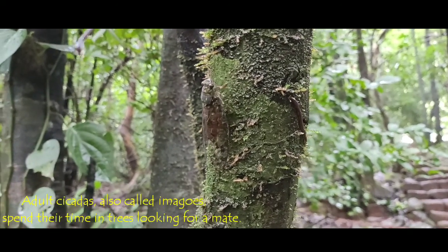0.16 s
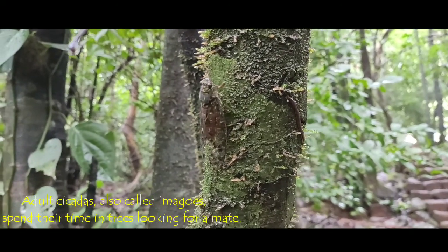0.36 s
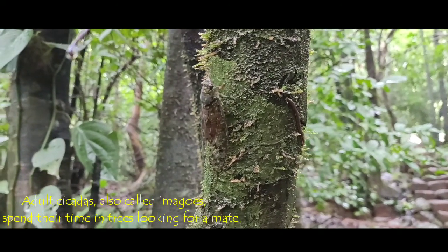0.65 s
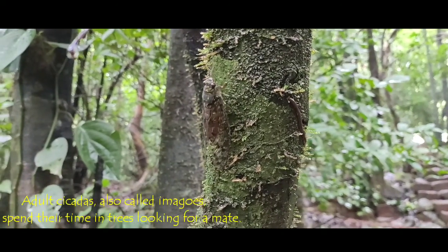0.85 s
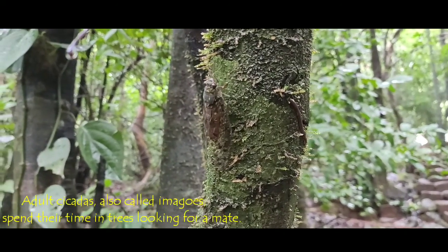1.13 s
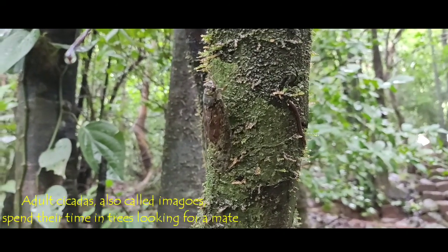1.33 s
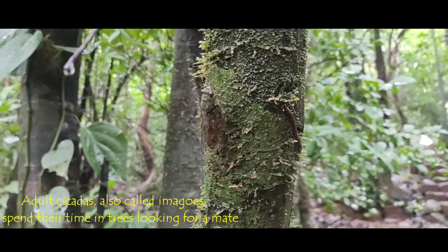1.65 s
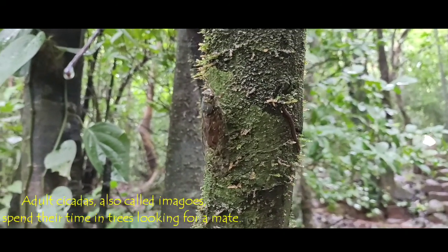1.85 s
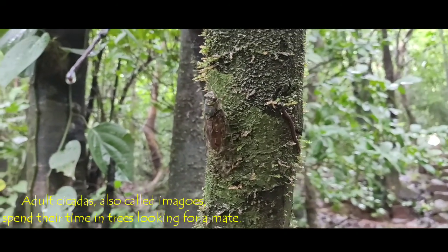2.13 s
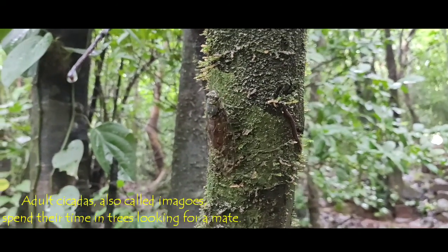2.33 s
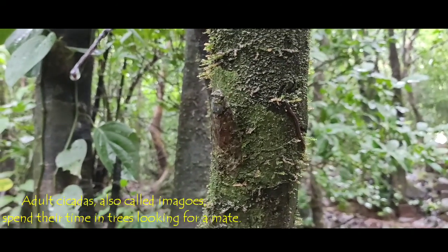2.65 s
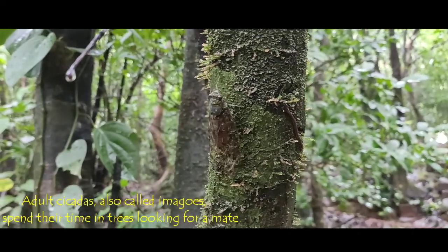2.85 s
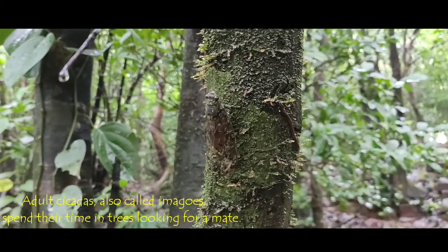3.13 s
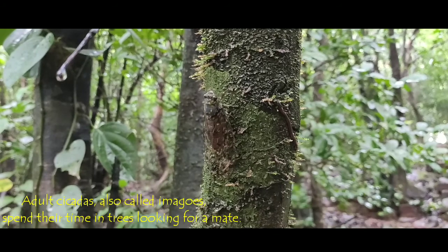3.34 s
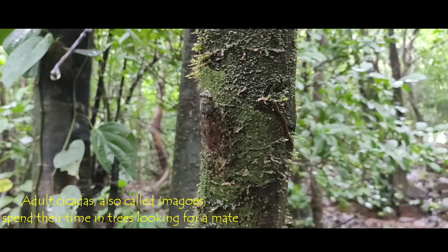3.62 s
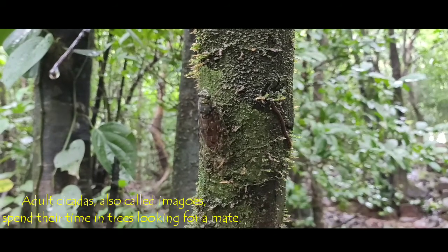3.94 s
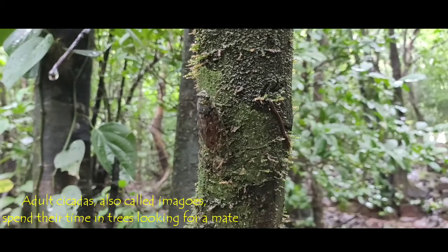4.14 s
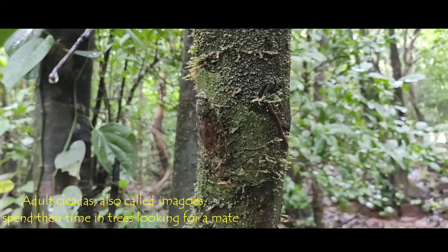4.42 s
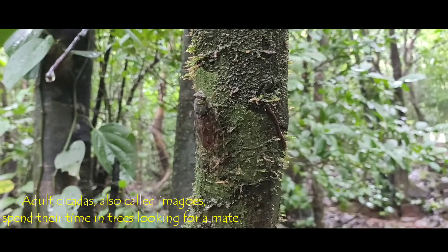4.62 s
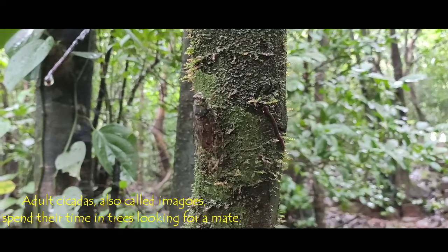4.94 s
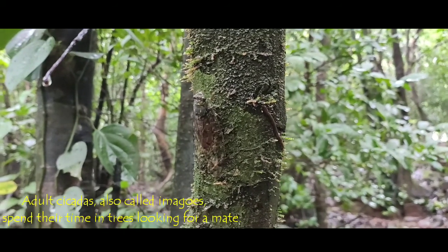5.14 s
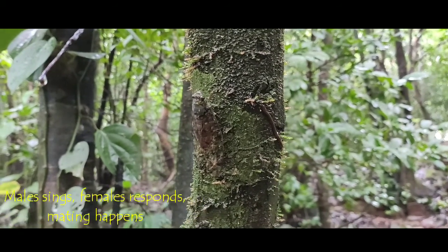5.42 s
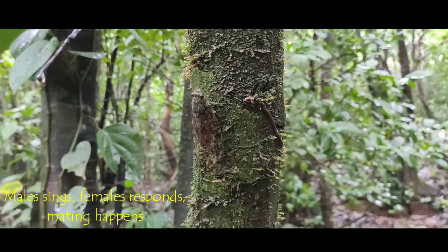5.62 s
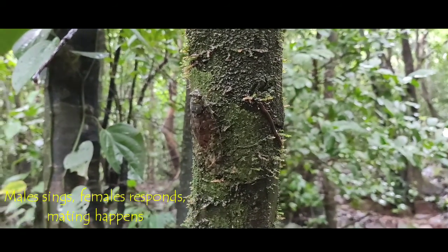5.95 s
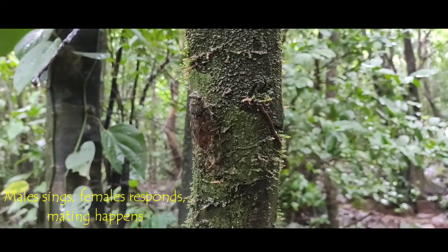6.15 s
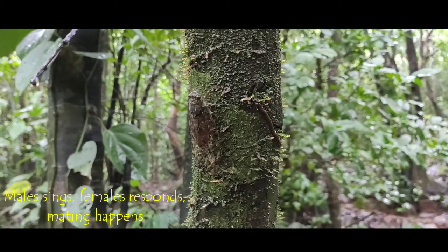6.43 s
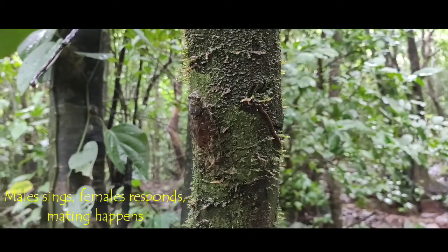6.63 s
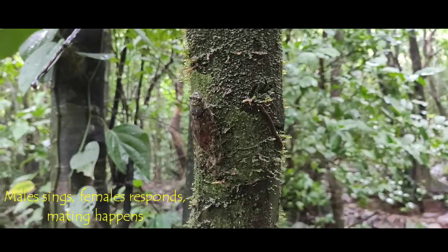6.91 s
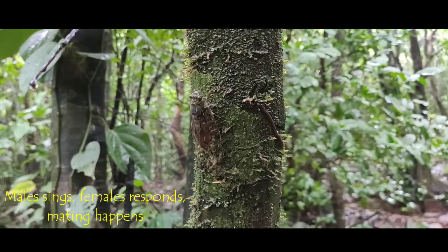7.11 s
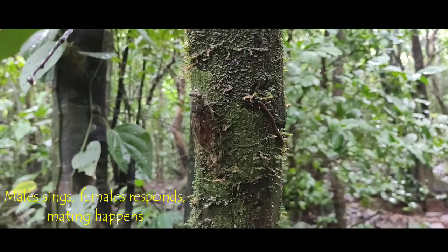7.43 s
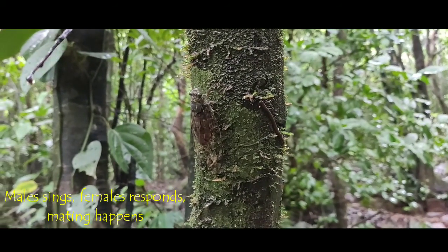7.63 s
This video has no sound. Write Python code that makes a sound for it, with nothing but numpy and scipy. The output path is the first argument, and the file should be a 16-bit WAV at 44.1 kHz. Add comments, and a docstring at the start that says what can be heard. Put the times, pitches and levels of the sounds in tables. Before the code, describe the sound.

In a still forest, one nearby cicada sings a high, dry, buzzing phrase over and over: quick chirps, a loud rasp, a softer rattle.

```python
"""A male cicada sings on a tree trunk in a quiet forest, close to a camera with two microphone ports.
Every click is a buckling of its tymbals, ringing the air sac in its abdomen. About once a second it sings
the same phrase: a run of short chirps, a loud rasp that falls in pitch, then a slow soft rattle.
Nearby bark and leaves scatter the song, distant trunks return a faint tail, and the air rumbles low."""
import sys
import numpy as np
from scipy import signal
from scipy.fft import rfft, irfft
from scipy.io import wavfile

SR = 44100
rng = np.random.default_rng(int(sys.argv[2]) if len(sys.argv) > 2 else 0)


def inscribe(sig):
    """Save sig as 16-bit PCM at rate SR to the path in sys.argv[1].

    A 1-D sig is mono; a 2-D sig holds one channel per row.
    Samples are clipped to [-1, 1] before scaling.
    """
    pcm = np.round(np.clip(np.atleast_2d(sig).T, -1, 1) * 32767)
    wavfile.write(sys.argv[1], SR, pcm.astype(np.int16))


N = 342657


def amp(db):
    """Decibels to gain."""
    return 10 ** (np.asarray(db) / 20)


def unit(x):
    """Scales each row to energy 1."""
    return x / np.sqrt(np.sum(x ** 2, -1, keepdims=True) + 1e-20)


def read(points, hz, column=1):
    """Reads one column of a table on a log-frequency axis."""
    table = np.transpose(points)
    return np.interp(np.log(hz + 1), np.log(table[0] + 1), table[column])


def forest_air(level_db=-53):
    """Still air all around the microphone: a steady low rumble, alike in both ports only in the bass."""
    # spectrum of the air (frequency [Hz], relative density [dB])
    spectrum = [(15, -9), (28, 2.5), (55, -2.5), (110, -9), (250, -14), (500, -20), (1200, -26.5),
                (2500, -26.5), (5000, -26), (9000, -31.5), (16000, -40)]
    # likeness of the air at the two ports (frequency [Hz], correlation [0-1])
    likeness = [(30, 0.92), (120, 0.98), (300, 0.89), (700, 0.49), (2000, .1)]
    hz = np.fft.rfftfreq(N, 1 / SR)
    left, other = rfft(rng.standard_normal((2, N)))
    same = read(likeness, hz)
    right = same * left + np.sqrt(1 - same ** 2) * other
    pair = irfft(np.array([left, right]) * amp(read(spectrum, hz)), N)
    balance = amp([[.4], [-.4]])
    return amp(level_db) * balance * np.sqrt(N) * unit(pair)


def forest_echoes(song, near_db=-11, near_s=.0079, far_db=-20):
    """Bark and leaves close by scatter the song at once; distant trunks return a faint tail."""
    # reverberation among the trees (frequency [Hz], time to fall 60 dB [s])
    decay = [(300, 0.57), (2000, 0.65), (5000, 0.47), (9000, 0.33), (16000, 0.66)]
    t = np.arange(SR) / SR
    near = unit(rng.standard_normal((2, SR)) * np.exp(-t / near_s) * (t > .001))
    hz, frame_s, frames = signal.stft(rng.standard_normal((2, SR)) * (t > .008), SR, nperseg=256)
    fade = amp(-60 * frame_s / read(decay, hz)[:, None])
    far = unit(signal.istft(frames * fade, SR, nperseg=256)[1][:, :SR])
    return signal.fftconvolve(song, amp(near_db) * near + amp(far_db) * far, axes=1)[:, :N]


def microphone_ports(song):
    """The insect sits off to one side: the camera's casing gives each port its own level and phase."""
    # the insect at the ports (frequency [Hz], left over right [dB], left phase lead [rad])
    response = [(200, 3, -2.45), (740, 4.5, -1.26), (1608, -2, -1.86), (2160, -6, 0.3), (2600, 1.6, -1.46),
                (3440, -2.5, -1), (4260, 1.7, -0.87), (5080, 10, -1.75), (5350, 2, -2.5), (5800, 9, -6),
                (7200, -2.8, -3.5), (8300, 0.5, -3), (8440, 1.3, -8), (14800, -1.2, -9.5)]
    hz = np.fft.rfftfreq(N, 1 / SR)
    left = amp(read(response, hz))
    right = np.exp(-1j * read(response, hz, column=2))
    gains = np.array([left, right]) * np.sqrt(2 / (1 + left ** 2))
    return irfft(rfft(song) * gains, N)


def trunk_echo(song, delay_s=.0003864, echo_db=-16):
    """The bark right under the insect returns each click at once and combs its spectrum."""
    hz = np.fft.rfftfreq(N, 1 / SR)
    comb = 1 + amp(echo_db) * np.exp(-2j * np.pi * hz * delay_s)
    return irfft(rfft(song) * comb, N) / np.hypot(1, amp(echo_db))


def add_clicks(mix, times, clicks):
    """Adds clicks, shaped (channels, clicks, samples), at their times."""
    for k, start in enumerate(times):
        part = mix[:, max(round(start * SR), 0):][:, :clicks.shape[-1]]
        part += clicks[:, k, :part.shape[1]]


def minimum_phase(spectrum, size=512):
    """The sharpest impulse response that has a given spectrum."""
    log_gain = np.log(amp(read(spectrum, abs(np.fft.fftfreq(size, 1 / SR)))))
    return unit(np.fft.ifft(np.exp(np.conj(signal.hilbert(log_gain)))).real)


def ring(hz, db, width_hz, rise_s, stray, size=512):
    """One dying resonance per click, each a little off pitch."""
    t = np.arange(size) / SR
    pitch = hz * (1 + stray * rng.standard_normal(len(db)))
    envelope = np.exp(-np.pi * width_hz * t) * (1 - np.exp(-t / rise_s)) ** 2
    return amp(db)[:, None] * unit(envelope * np.sin(2 * np.pi * pitch[:, None] * t))


def rib_crack(colour, db, crumple, crumple_s, alike, puff_hz=1600, size=512):
    """One snap per click, trailed by the crumpling ribs, which fold partly alike within a syllable."""
    t, hz = np.arange(size) / SR, np.fft.rfftfreq(size, 1 / SR)
    habit, chance = rng.standard_normal((2, 1, size)), rng.standard_normal((2, len(db), size))
    fade = np.exp(-t / crumple_s)
    grains = unit((np.sqrt(alike) * habit + np.sqrt(1 - alike) * chance) * fade)
    snap = unit((t == 0) + crumple * grains)
    puff = unit(chance * fade)  # the shapeless low end, new with every click
    lowpass = 1 / (1 + 1j * hz / puff_hz) ** 2
    highpass = (1j * hz / puff_hz) ** 2 * lowpass
    click = irfft(highpass * rfft(snap) + lowpass * rfft(puff), size)
    coloured = signal.fftconvolve(click, minimum_phase(colour)[None, None], axes=-1)[..., :size]
    return amp(db)[:, None] * unit(coloured)


def strokes(start, end, per_s, jitter, tempo_spread=.017, count=64):
    """Times of the muscle pulls within one syllable; each syllable has its own tempo."""
    tempo = per_s * (1 + tempo_spread * rng.standard_normal())
    gaps = (1 + jitter * rng.standard_normal(count)) / tempo
    times = start + np.cumsum(gaps) - gaps[0]
    return times[times <= max(end, start)]


def force(times, per_s, uneven_db):
    """Size of each click, so that a train of unit-energy clicks lies near 0 dB."""
    return np.sqrt(SR / per_s) * amp(uneven_db * rng.standard_normal(len(times)))[:, None]


def swell(x, rise, fall):
    """A bell curve: 1 at x = 0, with its own width on each side."""
    return np.exp(-(x / np.where(x < 0, rise, fall)) ** 2)


def phrase_at(time_s, overhang_s=.1):
    """The phrase that a chirp or rasp syllable belongs to."""
    # phrases, each built around the crest of its rasp (crest [s], crest span [s], air sac lead [s],
    # air sac fade [s], top pitch [Hz], end pitch [Hz], air sac strength [dB], octave strength [dB],
    # tymbal plate strength [dB], crack strength [dB], chirp strength [dB])
    phrases = [(0.708, .024, .030, .038, 2780, 2480, -21.8, -25.3, -36, -34, -.5),
               (1.655, .027, .034, .04, 2700, 2240, -22.3, -24.5, -32, -35, -.5),
               (2.577, .028, .028, .03, 2780, 2200, -22.8, -26.5, -32, -35.3, -.5),
               (3.548, .038, .028, .075, 2680, 2080, -25, -20, -28.5, -35.5, -.3),
               (4.503, .042, .004, .06, 2500, 2220, -30, -24.5, -31.5, -38, 0),
               (5.496, .042, .035, .105, 2580, 2060, -23.5, -17, -31, -33.5, .5),
               (6.506, .042, .012, .08, 2540, 2080, -24.3, -18, -31, -34.6, .5),
               (7.404, .044, .006, .06, 2470, 2200, -29, -27.5, -33, -36.5, 1),
               (8.350, .042, .012, .08, 2540, 2090, -24, -17.5, -31, -34, 3)]
    return next(row for row in phrases if time_s < row[0] + overhang_s)


def rattles(per_s=99, relax_s=.04, rebound_s=.0046, sac_hz=1965, overtone_hz=4100, rebound_hz=5300):
    """Slow strokes: the tymbal buckles in with a low knock and springs back with a high tick."""
    # rattles (start [s], end [s], strength [dB], push left from the rasp [0-1])
    syllables = [(.75, .845, -.5, .75), (.868, 1.0, -1.5, .1), (1.712, 1.945, 0, .7), (2.62, 2.705, 0, .4),
                 (2.74, 2.88, -1, .1), (3.626, 3.675, 1, .9), (3.699, 3.877, 0, .2), (4.565, 4.66, .5, .9),
                 (4.675, 4.705, 1.5, .2), (4.725, 4.838, 1.5, .1), (5.576, 5.802, 1.3, 1),
                 (6.592, 6.826, 1.5, 1), (7.496, 7.668, 2.5, .8)]
    # dry crack of the tymbal ribs in a rattle (frequency [Hz], relative level [dB])
    colour = [(200, -19), (1200, -11), (1800, 5.5), (2600, -1), (3300, 5), (4100, -17), (4650, 5),
              (5900, 6), (6900, -2.5), (7700, -4.5), (9500, -8.5), (12000, -11), (13300, -10), (15700, -19)]
    out = np.zeros((2, N))
    for start, end, strength_db, first_push in syllables:
        times = strokes(start, end - .003, per_s, jitter=.15)
        push = first_push * np.exp((start - times) / relax_s)  # level and pitch sink as it dies away
        sac_db = strength_db - 47 + 10.5 * push
        overtone_db = strength_db - 66 + 32 * push
        snap_db = strength_db - 47 + 5.7 * push
        sac = ring(sac_hz + 80 * push, sac_db, width_hz=215, rise_s=.0002, stray=.028)
        overtone = ring(overtone_hz, overtone_db, width_hz=450, rise_s=.0006, stray=.024)
        ribs_in = rib_crack(colour, snap_db - .5, crumple=3.8, crumple_s=.0017, alike=.2)
        tick = ring(rebound_hz, snap_db - 1.5, width_hz=1000, rise_s=.0002, stray=.067)
        ribs_out = rib_crack(colour, snap_db - 2.5, crumple=2.1, crumple_s=.001, alike=.23)
        add_clicks(out, times, (sac + overtone + ribs_in) * force(times, per_s, uneven_db=.45))
        add_clicks(out, times + rebound_s, (tick + ribs_out) * force(times, per_s, uneven_db=1))
    return out


def chirps(per_s=212, tensing_s=.35, lag_s=.002, upper_hz=2680, rebound_s=.0044, rebound_hz=5900):
    """A handful of dry clicks each: one hard stroke, then the two tymbals fall into step."""
    # chirps (start [s], end [s])
    syllables = [(.004, .02), (.054, .076), (.105, .196), (.229, .245), (.283, .307), (.34, .372),
                 (.405, .434), (.462, .489), (.516, .545), (1.036, 1.059), (1.087, 1.157), (1.187, 1.218),
                 (1.244, 1.262), (1.299, 1.319), (1.355, 1.38), (1.411, 1.436), (1.464, 1.501),
                 (1.52, 1.566), (1.987, 2.02), (2.039, 2.066), (2.101, 2.119), (2.155, 2.179),
                 (2.213, 2.246), (2.271, 2.306), (2.328, 2.36), (2.384, 2.421), (2.91, 2.932),
                 (2.957, 2.981), (2.999, 3.036), (3.063, 3.092), (3.123, 3.143), (3.175, 3.203),
                 (3.231, 3.256), (3.284, 3.312), (3.34, 3.374), (3.396, 3.43), (3.914, 3.934),
                 (3.966, 3.985), (4.021, 4.049), (4.082, 4.112), (4.149, 4.164), (4.2, 4.232),
                 (4.258, 4.29), (4.313, 4.34), (4.368, 4.406), (4.88, 4.898), (4.935, 4.966),
                 (4.994, 5.021), (5.052, 5.081), (5.113, 5.141), (5.172, 5.21), (5.229, 5.261),
                 (5.289, 5.314), (5.843, 5.866), (5.898, 5.928), (5.94, 5.98), (6.01, 6.035),
                 (6.068, 6.101), (6.127, 6.161), (6.188, 6.214), (6.242, 6.271), (6.299, 6.325),
                 (6.353, 6.386), (6.869, 6.89), (6.923, 6.954), (6.982, 7.011), (7.042, 7.067),
                 (7.097, 7.126), (7.157, 7.186), (7.213, 7.244), (7.272, 7.312), (7.698, 7.724),
                 (7.752, 7.769)]
    # dry crack of the tymbal ribs in a chirp (frequency [Hz], relative level [dB])
    colour = [(200, -18.5), (1200, -13.5), (1800, -11.5), (2700, 1), (3600, 1), (4600, 1.5), (5300, -8.5),
              (6100, -5), (7500, -9), (9000, -15), (10700, -13), (13000, -18.5), (15700, -25)]
    out = np.zeros((2, N))
    for start, end in syllables:
        crest, *_, strength_db = phrase_at(start)
        times = strokes(start + .0008, end - .005, per_s, jitter=.11)
        later = np.arange(len(times)) > 0
        times = times + lag_s * later
        # the abdomen tenses towards the crest: the chirps rise in pitch, ring less and crack harder
        tension = np.exp((start - crest) / tensing_s)
        sac_hz = 2000 + 400 * tension
        sac_db = strength_db - 42.3 - 7.5 * tension - .54 * later
        snap_db = strength_db - 45.4 + 11.5 * tension + 1.4 * ~later
        sac = ring(sac_hz, sac_db, width_hz=175, rise_s=.00033, stray=.017)
        # harder pulls wake a second mode of the abdomen
        upper = ring(upper_hz, snap_db - 8.5, width_hz=124, rise_s=.00009, stray=.051)
        ribs = rib_crack(colour, snap_db, crumple=1.5, crumple_s=.0009, alike=.11)
        tick = ring(rebound_hz, snap_db - 9, width_hz=1800, rise_s=.0002, stray=.12)
        add_clicks(out, times, (sac + upper + ribs) * force(times, per_s, uneven_db=1.87))
        add_clicks(out, times + rebound_s, tick[None] * force(times, per_s, uneven_db=0))
    return out


def rasp_course(times, climb_s=.08, plate_lead_s=.052, crack_lag_s=.012):
    """Pitch and levels in a rasp: the plate peaks, then the air sac, then its octave as pitch falls."""
    crest, span, sac_lead, sac_fade, top_hz, end_hz, *strengths = phrase_at(times[0])
    sac_db, octave_db, plate_db, crack_db, _ = strengths
    t = times - crest
    stretch = swell(t + 1.2 * span, climb_s, 1.6 * span)  # the pitch tops out before the crest
    return (end_hz + (top_hz - end_hz) * stretch,
            sac_db - 14 * (1 - swell(t + sac_lead, rise=.033, fall=sac_fade)),
            octave_db - 27 * (1 - swell(t, rise=span, fall=1.5 * span)),
            plate_db - 17 * (1 - swell(t + plate_lead_s, rise=.031, fall=.035)),
            crack_db - 9 * (1 - swell(t + sac_lead - crack_lag_s, rise=.075, fall=.075)))


def rasps(accent_db=3, accent_s=.005, release_db=-2, release_s=.006, weak_db=-3.2, plate_hz=7550):
    """At full effort the clicks come fast and even; the abdomen stretches and its resonances fall."""
    # rasp syllables (start [s], end [s], strength [dB], click rate [1/s])
    syllables = [(.569, .608, -2, 239), (.626, .728, 0, 249), (1.571, 1.634, 0, 255), (1.653, 1.69, 0, 239),
                 (2.441, 2.482, 0, 240), (2.496, 2.612, 0, 252), (3.451, 3.604, 0, 247),
                 (4.429, 4.474, 2, 237), (4.495, 4.555, .3, 223), (5.346, 5.378, -1, 240),
                 (5.401, 5.549, 0, 252), (6.407, 6.453, 0, 244), (6.466, 6.571, 0, 254),
                 (7.33, 7.372, 0, 241), (7.393, 7.47, 0, 238)]
    # dry crack of the tymbal ribs in a rasp (frequency [Hz], relative level [dB])
    colour = [(100, -12), (400, -11), (750, -12), (1250, -5.5), (1900, 5.5), (3000, -3.5), (3650, 0),
              (4200, 9.5), (5200, -5.5), (6700, 1.5), (8000, -3), (11200, -11.5), (13000, -11),
              (15700, -16.5)]
    out = np.zeros((2, N))
    for start, end, strength_db, per_s in syllables:
        times = strokes(start + .0005, end, per_s, jitter=.03, tempo_spread=.005)
        sac_hz, sac_db, octave_db, plate_db, crack_db = rasp_course(times)
        # a hard opening stroke rings the air sac; the muscle slackens at the end
        sac_db = sac_db + accent_db * np.exp((start - times) / accent_s)
        effort_db = strength_db + release_db * np.exp((times - end) / release_s)
        turn_db = weak_db * (np.arange(len(times)) % 2 - .5)  # every other click is weaker
        sac = ring(sac_hz, sac_db - 2.5, width_hz=280, rise_s=.00025, stray=.028)
        upper = ring(1.21 * sac_hz, sac_db - 9.3, width_hz=340, rise_s=.0002, stray=.082)
        octave = ring(1.989 * sac_hz, octave_db - .8, width_hz=520, rise_s=.00055, stray=.0073)
        body = ring(.34 * sac_hz, octave_db - 21.5, width_hz=146, rise_s=.0006, stray=.13)
        plate = ring(plate_hz, plate_db - 1.5, width_hz=280, rise_s=.00066, stray=.016)
        ribs = rib_crack(colour, crack_db + 7.5, crumple=5.2, crumple_s=.002, alike=.53)
        clicks = (sac + upper + octave + body + plate + ribs) * amp(effort_db + turn_db)[:, None]
        add_clicks(out, times, clicks * force(times, per_s, uneven_db=1.16))
    return out


def scene():
    """The cicada close to the microphone, with its echoes and the forest air behind it."""
    song = microphone_ports(trunk_echo(chirps() + rasps() + rattles()))
    return song + forest_echoes(song) + forest_air()


def record(dry, ceiling=.55, edge_hz=15900):
    """The camera gently rounds off the loudest clicks, then cuts the highest treble."""
    rounded = ceiling * np.tanh(dry / ceiling)
    lowpass = signal.firwin(401, edge_hz, window=("kaiser", 8), fs=SR)
    return signal.oaconvolve(rounded, lowpass[None], "same", axes=1)


dry = scene()
out = record(dry)
inscribe(out)
```